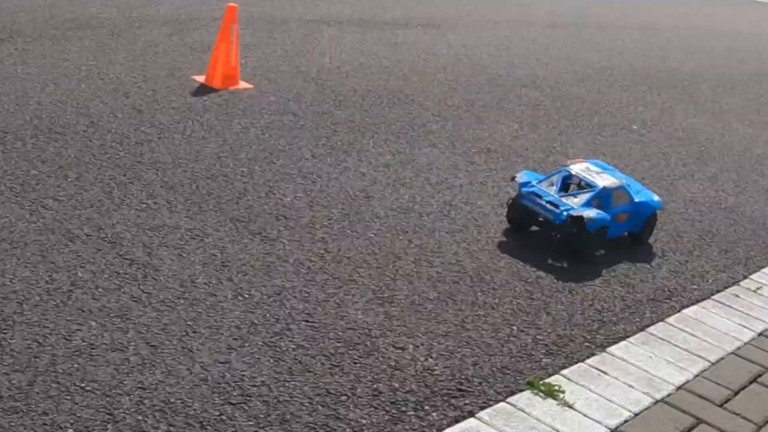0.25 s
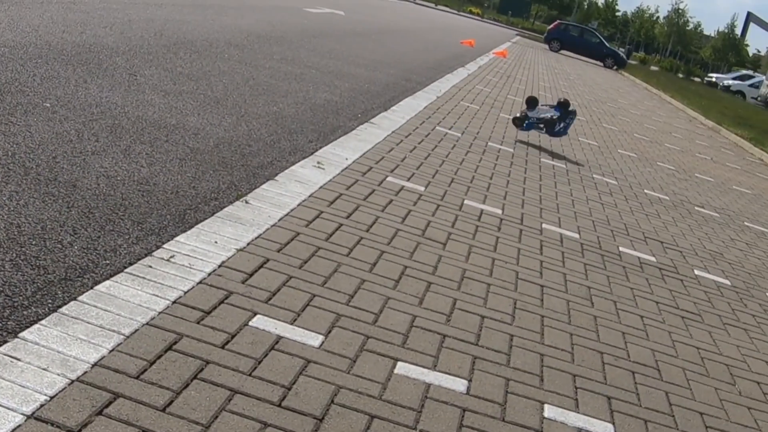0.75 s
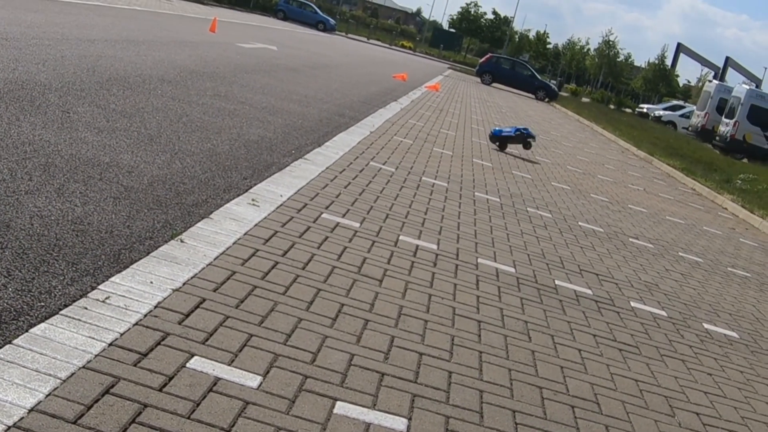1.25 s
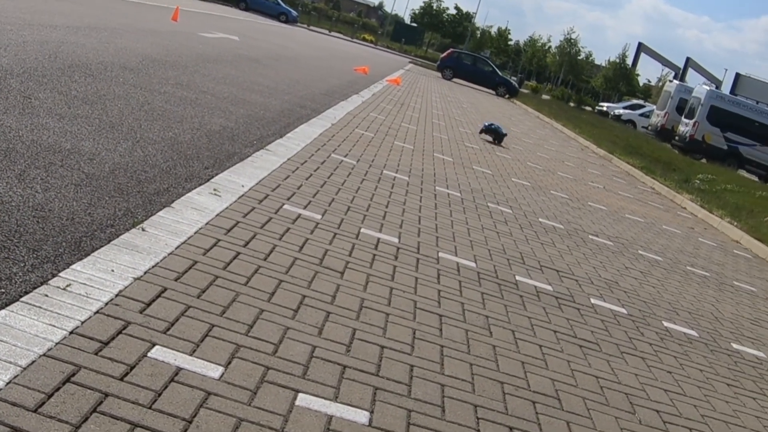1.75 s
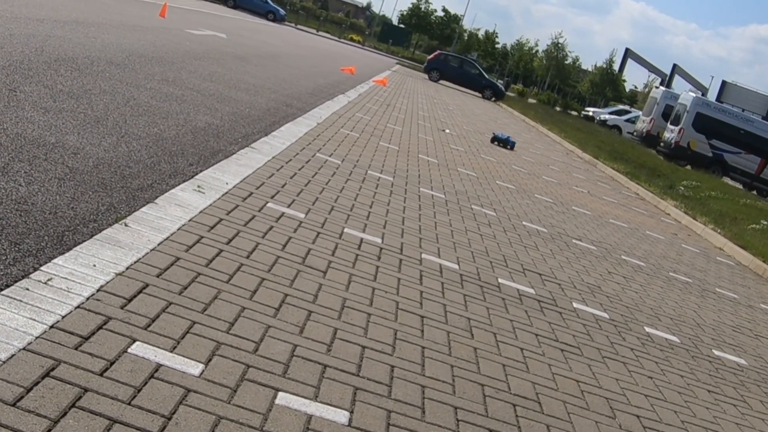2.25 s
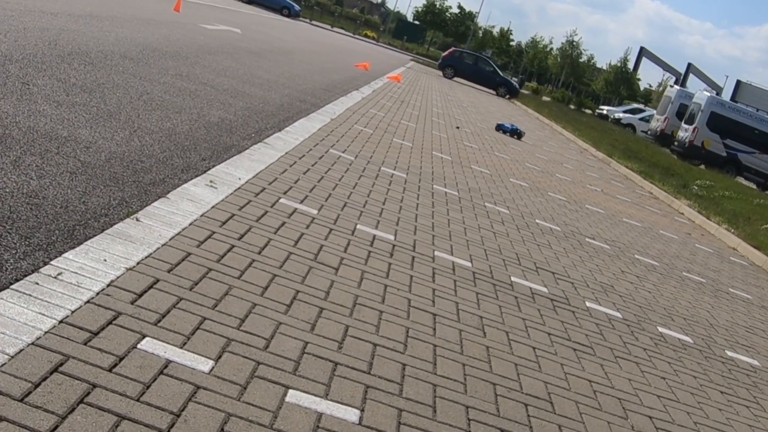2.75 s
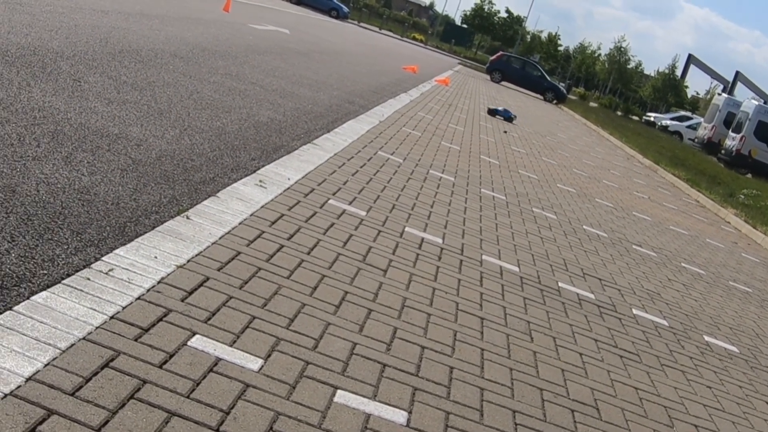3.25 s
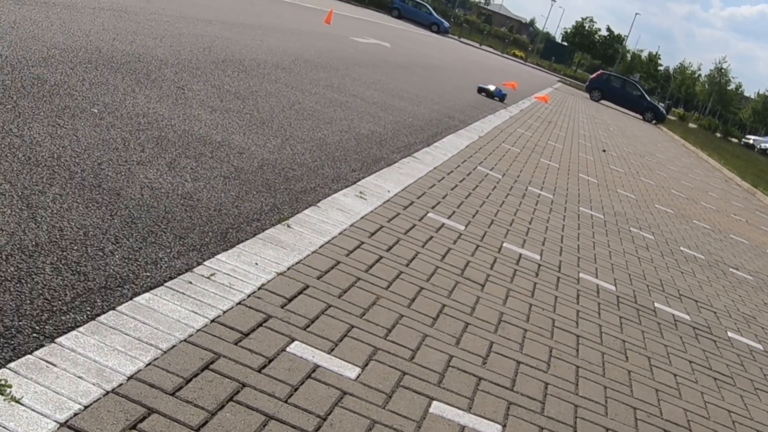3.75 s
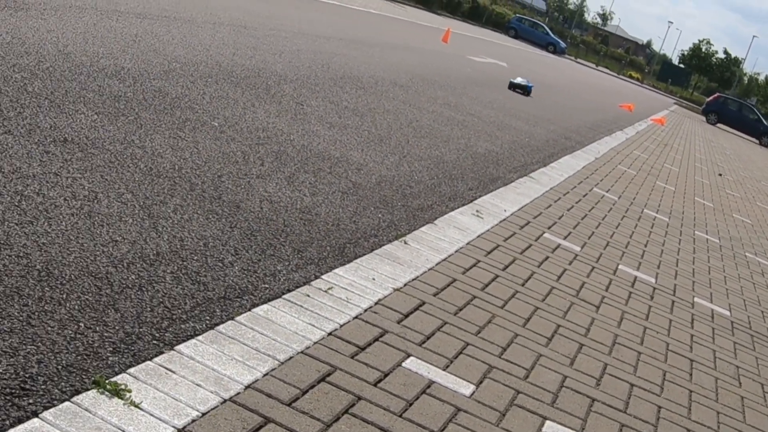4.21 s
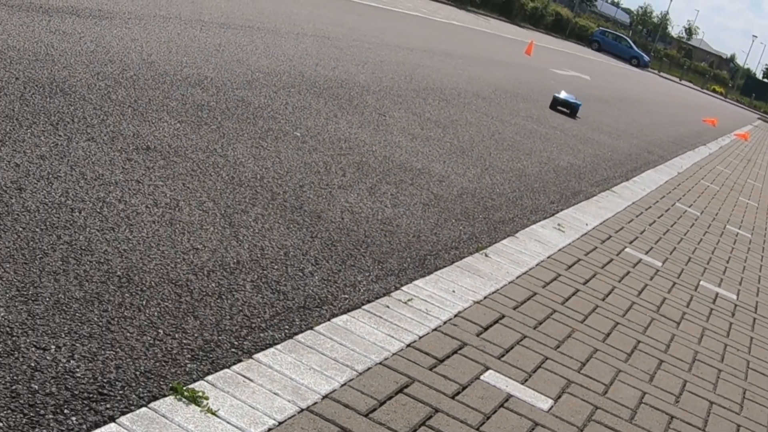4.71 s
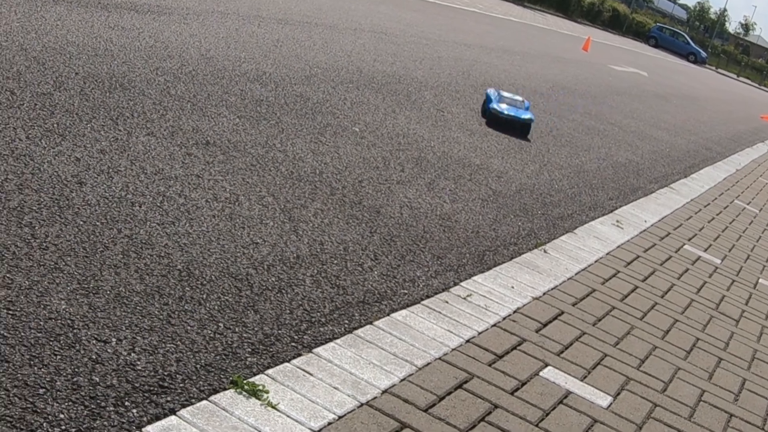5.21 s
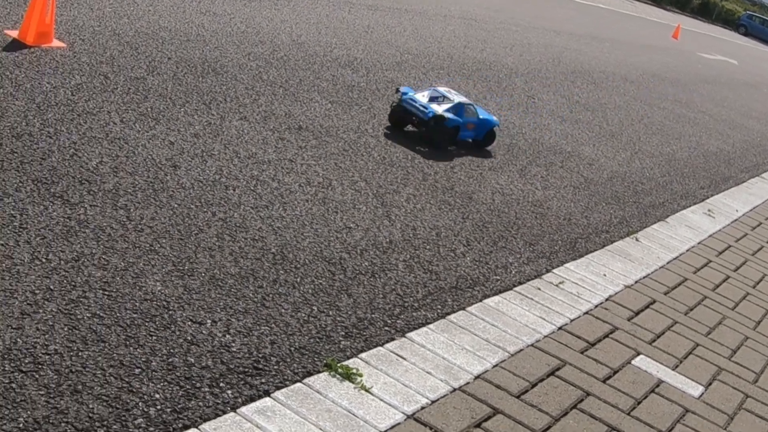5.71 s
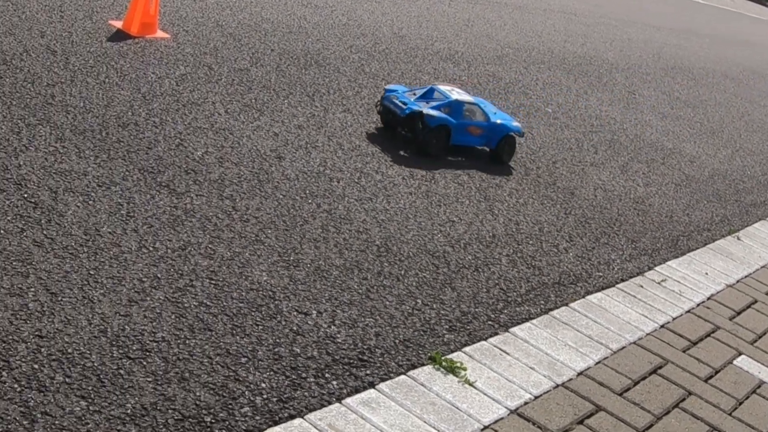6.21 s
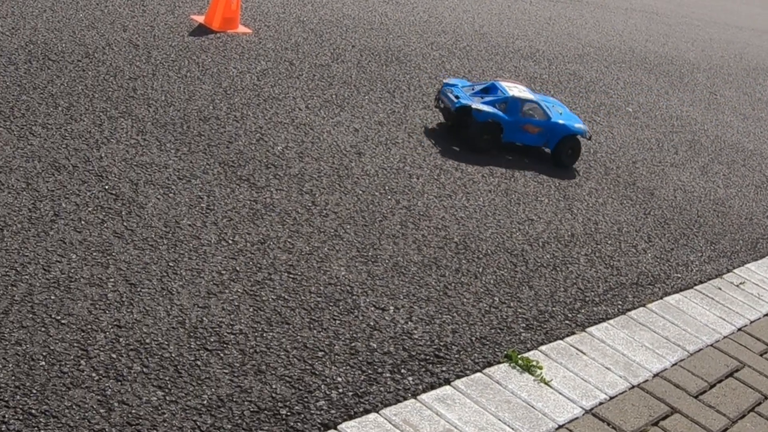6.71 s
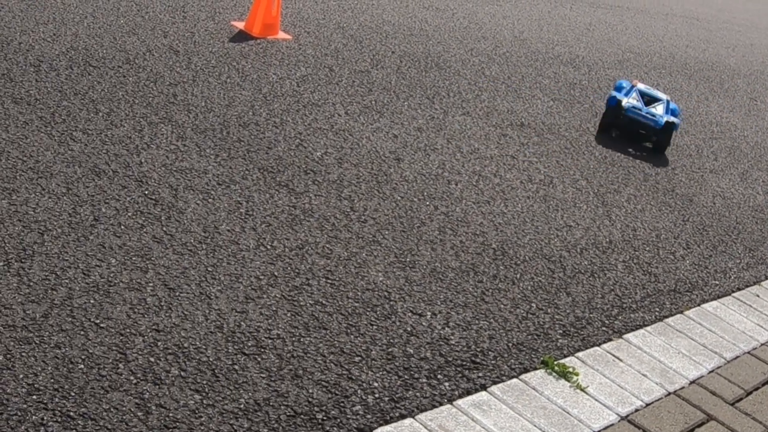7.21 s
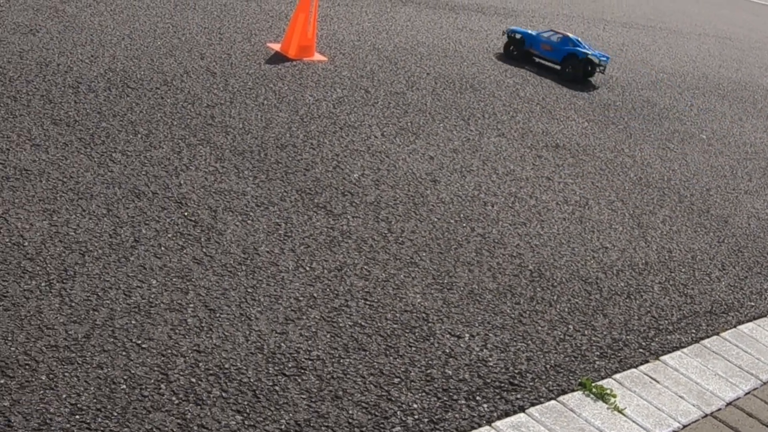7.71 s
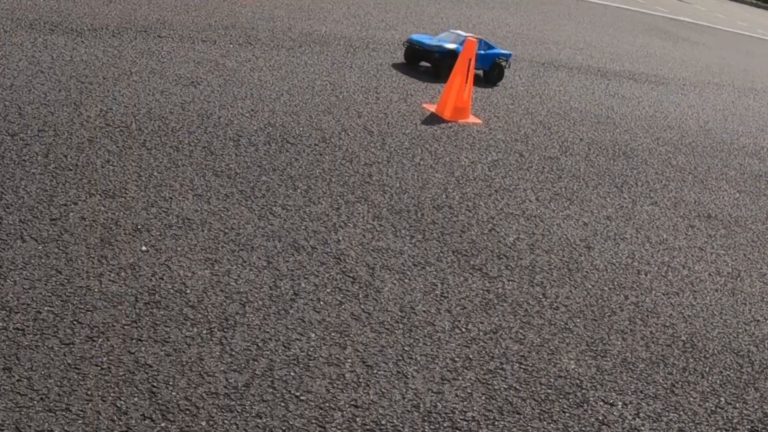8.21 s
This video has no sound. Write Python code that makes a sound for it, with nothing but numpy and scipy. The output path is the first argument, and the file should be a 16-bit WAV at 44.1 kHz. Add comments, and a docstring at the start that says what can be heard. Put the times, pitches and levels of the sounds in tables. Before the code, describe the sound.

High gear whine breaks into hard plastic knocks on brick; later brief motor blips, tyre scrabble and close controller clicks amid low wind rumble.

```python
"""A small electric toy truck on asphalt and brick, under gusty wind, with distant traffic and trees behind.
It races with whining gears, then knocks and scrapes over the brick as it tumbles; wind mode fades from mono to stereo.
A few throttle blips follow, the hand controller clicks close to the microphone, and the truck drives off and skids.
After more clicks it comes back in short blips. Gears are multiples of a mesh tone sent through a plastic shell;
tyres, wind and clicks are shaped noise, knocks are spikes with a short rattle."""
import sys
import numpy as np
from scipy import signal
from scipy.fft import rfft, irfft, next_fast_len
from scipy.io import wavfile
from scipy.ndimage import uniform_filter1d, map_coordinates

SR = 44100
rng = np.random.default_rng(int(sys.argv[2]) if len(sys.argv) > 2 else 0)


def output_pcm(signal):
    """Save a mono or channel-first signal as 16-bit PCM at the path in sys.argv[1].

    Samples are clipped to [-1, 1] before scaling.
    """
    pcm = np.clip(np.atleast_2d(signal).T, -1, 1) * 32767
    wavfile.write(sys.argv[1], SR, np.round(pcm).astype(np.int16))


N = 373086  # length [samples]


def amp(db):
    """Amplitude factor of a level in dB."""
    return 10 ** (np.asarray(db) / 20)


def unit(x):
    """x scaled to an rms of 1."""
    return x / np.sqrt(np.mean(x ** 2, axis=-1, keepdims=True) + 1e-20)


def along(points, hz, axis=1):
    """One column of (frequency, value, ..) rows, interpolated on a log frequency axis."""
    points = np.array(points)
    return np.interp(np.log(hz + 1), np.log(points[:, 0] + 1), points[:, axis])


def curves(rows):
    """One value per sample for each column after the time."""
    s, *columns = np.transpose(rows)
    return [np.interp(np.arange(N) / SR, s, column) for column in columns]


def wobble(rate):
    """A smooth random curve with `rate` knots a second."""
    coarse = np.arange(0, N + 8, 8)
    knots = rng.standard_normal(int(N * rate / SR) + 4)
    return np.interp(np.arange(N), coarse, map_coordinates(knots, [coarse * rate / SR]))


def filtered(x, response):
    """x through a complex response of frequency, padded by at least half a second."""
    size = next_fast_len(N + SR // 2)
    spectrum = rfft(x, size) * response(np.fft.rfftfreq(size, 1 / SR))
    return irfft(spectrum, size)[..., :N]


def coloured(x, spectrum):
    """x filtered to a spectrum table, then brought to an rms of 1."""
    return unit(filtered(x, lambda hz: amp(along(spectrum, hz))))


# Distant traffic and trees, spectrum: (frequency [Hz], relative density [dB per Hz])
FAR_SPECTRUM = [(180, -34), (300, -14.5), (450, -24), (850, -18), (1540, -20.5), (2300, -32.5), (2600, -46),
                (7080, -35), (15700, -92)]


def distant_traffic_and_trees():
    """Far sources blend into one noise of slowly varying level."""
    level_db = -61.0 + 0.53 * wobble(4.88)
    return amp(level_db) * coloured(rng.standard_normal(N), FAR_SPECTRUM)


# Wind at the microphone: (time [s], buffet level midway between the ports [dB])
WIND_LEVEL = [(0, -40.5), (.42, -29), (.9, -38.5), (1.37, -41), (1.52, -36), (2.26, -36.5), (2.52, -32.5),
              (2.69, -39.5), (3, -35), (3.86, -39.5), (3.96, -34), (4.09, -44.5), (4.25, -36), (4.4, -42.5),
              (5.2, -38.5), (5.43, -46), (5.7, -30.5), (6.48, -37.5), (6.84, -39.5), (7.1, -36),
              (7.21, -24.5), (7.36, -36.5), (7.64, -31), (8, -34.5), (8.46, -28)]
# Wind rumble, spectrum: (frequency [Hz], relative density [dB per Hz])
WIND_SPECTRUM = [(12, -39), (22, 5), (35, 1.5), (60, -5.5), (110, -10), (190, -16.5), (280, -28),
                 (500, -47), (1000, -100)]


def wind():
    """Lumpy buffeting, stronger on the right port; only the deepest part is shared."""
    shared, own = (amp(3.4 * wobble(14)) * coloured(rng.standard_normal(N), WIND_SPECTRUM) for _ in range(2))
    alike = lambda hz: 0.41 / (1 + (hz / 150) ** 2)
    unlike = lambda hz: np.sqrt(np.abs(1 - alike(hz) ** 2)) * (1 + hz / 400)
    left = filtered(shared, alike) + filtered(own, unlike)
    port_db = curves(WIND_LEVEL)[0] + [[-4], [4]]
    return amp(port_db) * unit(np.array([left, shared]))


# Hand controller close by: (time [s], level [dB], length before dying away [s])
CONTROLLER_CLICKS = [(3.886, -34.5, 0.014), (3.921, -35, 0.0089), (3.955, -32, 0.015),
                     (3.9593, -34.5, .001), (4.128, -38.5, 0.025), (6.212, -46, 0.0027),
                     (6.2421, -49, .004), (6.284, -55, .02), (6.35, -38.5, 0.012), (6.368, -38, 0.0065),
                     (6.375, -34.5, 0.0066), (6.394, -32.5, 0.014), (6.4105, -31, .001),
                     (6.416, -32.5, .0015), (6.419, -46, .022), (6.458, -43, 0.0075), (6.4673, -37.5, .002),
                     (6.881, -41.5, .006), (7.198, -41, 0.0066), (8.209, -39, 0.006),
                     (8.225, -26.5, 0.0034)]
# The controller's plastic case, spectrum: (frequency [Hz], relative density [dB per Hz])
CONTROLLER_SPECTRUM = [(240, -37), (400, 3.5), (875, -6.5), (1370, 1.5), (2000, 5), (3130, -7), (4810, -8),
                       (5190, -10.5), (8620, -4), (15700, -34)]


def controller():
    """Trigger and wheel scrape and click close to the right port; the left hears them dull and inverted."""
    level, t = np.zeros(N + SR), np.arange(SR // 20) / SR
    case = coloured(rng.standard_normal(N) * amp(4.7 * wobble(1500)), CONTROLLER_SPECTRUM)
    for s, db, length in CONTROLLER_CLICKS:
        catch = 1 + 0.18 * np.exp(-t / 0.0017)  # the part breaks loose with a tick
        decay = amp(-60 * np.clip(t - length, 0, 1) / 0.021)  # 60 dB in 21 ms
        level[round(s * SR):][:len(t)] += amp(db) * catch * decay
    right = level[:N] * case
    left = filtered(right, lambda hz: -amp(-6) / (1 + 1j * hz / 2500))
    return np.array([left, right])


# The truck's plastic shell, resonances: (centre [Hz], width [Hz], gain [dB])
SHELL_MODES = [(982, 390, 2.5), (1530, 340, 4), (1940, 600, 0.5), (3150, 850, 1), (3915, 760, 0),
               (6330, 500, 0)]


def shell(f):
    """Resonances of the plastic body, with some sound passing beside them."""
    response = 0.072
    for k, (centre, width, db) in enumerate(SHELL_MODES):
        resonance = 1j * f * width / (centre * centre - f * f + 1j * f * width)
        response = response + (-1) ** k * amp(db) * resonance
    return response


def bursts(rows, t60):
    """A sharp spike with a short rattle of noise for each (time [s], level [dB]) row; t60 [s] to fall 60 dB."""
    out, t = np.zeros(N + SR), np.arange(SR // 20) / SR
    for s, db in rows:
        puff = 0.5 * amp(-60 * t / t60) * rng.standard_normal(len(t))
        puff[0] = -2.1
        out[round(s * SR):][:len(t)] += amp(db) * puff
    return out[:N]


# Shell and stones on brick, burst levels before filtering:
# (time [s], crack level [dB], thud level [dB], tick level [dB])
BRICK_KNOCKS = [(.396, -20, -7, -30), (0.4094, -2, -4.5, -25), (0.4247, -6, -3, -25), (0.4342, -4, -6, -14),
                (0.4432, -4.5, -13, -14), (0.461, -2, -12, -22), (0.4726, -6, -14, -24),
                (.488, -2.5, -19, -15), (.5166, -8, -21, -15), (0.552, -19, -24, -8), (0.568, -9, -14, -20),
                (.592, -18, -7, -24), (0.964, -23, -25, -32), (0.983, -23, -17, -36),
                (1.001, -11, -10, -28), (1.042, -14, -2, -27), (1.051, -8.5, -7.5, -25),
                (1.062, -12, -10, -26), (1.32, -36, -20.5, -48), (1.432, -22, -16.5, -34),
                (1.732, -23, -29, -46)]


def knocks():
    """Each contact cracks in the shell, thuds in the chassis and ticks where grit is hit."""
    s, crack_db, thud_db, tick_db = np.transpose(BRICK_KNOCKS)
    dulled_shell = lambda f: (shell(f) + 0.36) / (1 + 1j * f / 4500) ** 2
    treble = lambda f: (1j * f / (5000 + 1j * f)) ** 2
    chassis = lambda f: 1j * f * 300 / (330 ** 2 - f * f + 1j * f * 300)
    crack = filtered(bursts(zip(s, crack_db), 0.011), dulled_shell)
    tick = filtered(bursts(zip(s, tick_db), 0.0082), treble)
    thud = filtered(bursts(zip(s, thud_db), 0.037), chassis)
    return crack + tick + thud


def gritty(depth_db, rate, patchy_db):
    """Noise whose strength jumps as grit catches, with brief narrow squeaks and hollows."""
    z = signal.stft(rng.standard_normal(N), nperseg=512)[2]
    across_hz = uniform_filter1d(rng.standard_normal(z.shape), 2, 0)
    patches = uniform_filter1d(across_hz, 5, 1)
    noise = signal.istft(z * amp(patchy_db * patches / patches.std()), nperseg=512)[1][:N]
    return noise * amp(depth_db * wobble(rate) + 1.2 * wobble(20))


def swells(start, length, db, attack_s, swell_db, fall_db_per_s):
    """Power of events that fade in around their start, grow until their end and then die away."""
    coarse = np.arange(0, N, 32)
    t = coarse[:, None] / SR - start
    left = np.clip(1 - t / length, 0, 1)  # share of the event still to come
    level_db = db - swell_db * left ** 2 - fall_db_per_s * np.clip(t - length, 0, None)
    fade_in = np.clip(0.5 + t / attack_s, 0, 1)
    power = np.sum(amp(2 * level_db) * fade_in ** 2, 1)
    return np.interp(np.arange(N), coarse, power)


# Changing rolling, coasting and skidding levels: (time [s], scrabble level [dB], hiss level [dB])
ROLLING_LEVELS = [(0, -36.5, -31), (.37, -35, -32), (.43, -37, -32), (.62, -38, -39), (.86, -63, -60),
                  (1.11, -45.5, -58), (1.29, -63, -75), (1.41, -42.5, -54), (1.65, -57.5, -56.5),
                  (2.24, -69, -75.5), (2.9, -58, -66), (3.4, -56.5, -61.5), (3.67, -54, -64),
                  (3.86, -53, -55), (4.2, -57, -53.5), (4.4, -52, -48), (4.52, -48.5, -37.5),
                  (4.8, -40.5, -40), (4.941, -48.5, -46.5), (4.99, -43, -40.5), (5.15, -38.5, -42.5),
                  (5.42, -33, -43.5), (5.6, -35, -47.5), (5.73, -54.5, -50.5), (6.19, -52.5, -54.5),
                  (6.33, -64, -66.5), (6.49, -51.5, -58.5), (6.8, -55.5, -61.5), (7.1, -54.5, -51.5),
                  (7.66, -52, -56.5), (8.05, -48.5, -52), (8.46, -47, -49.5)]
# The tumbling truck scrapes the brick: (time [s], length [s], scrabble level [dB], hiss level [dB])
BRICK_SCRAPES = [(0.645, 0.095, -39.5, -42.5), (0.781, 0.043, -42, -50), (0.887, 0.036, -52, -58),
                 (0.963, 0.05, -30.5, -41.5), (1.034, 0.022, -25, -39.5), (1.152, 0.027, -41, -62),
                 (1.33, 0.034, -46.5, -47), (1.422, .1, -44, -42.5), (1.544, 0.054, -43.5, -46),
                 (1.734, 0.028, -41.5, -47)]
# Tyre scrabble, spectrum: (frequency [Hz], relative density [dB per Hz])
SCRABBLE_SPECTRUM = [(120, -6.5), (250, -3.5), (450, -2.5), (900, -1), (1300, -8.5), (2300, -19.5),
                     (4000, -25.5), (8000, -53)]
# Gear and grit hiss, spectrum: (frequency [Hz], relative density [dB per Hz])
HISS_SPECTRUM = [(700, -35), (1200, -10.5), (1500, -8), (2000, -8), (2500, -13), (3600, -13.5), (5100, -20),
                 (6500, -10.5), (8300, -17.5), (9300, -17), (10800, -21.5), (13200, -21.5), (14600, -32),
                 (16000, -39)]
SCRAPE = dict(attack_s=0.006, swell_db=4.5, fall_db_per_s=504)
WHEELSPIN = dict(attack_s=0.073, swell_db=4.5, fall_db_per_s=392)


def rolling():
    """Tyres scrabble through the shell; gears and grit hiss. Scrapes and wheelspin add power to rolling and skidding."""
    scrape_s, scrape_length, *scrape_db = np.transpose(BRICK_SCRAPES)
    blip_s, blip_length, *_, spin_scrabble_db, spin_hiss_db = np.transpose(THROTTLE_BLIPS)
    levels = []
    for rolling_db, scraping_db, spinning_db in zip(curves(ROLLING_LEVELS), scrape_db,
                                                    (spin_scrabble_db, spin_hiss_db)):
        power = amp(2 * rolling_db)
        power = power + swells(scrape_s, scrape_length, scraping_db, **SCRAPE)
        power = power + swells(blip_s, blip_length, spinning_db, **WHEELSPIN)
        levels.append(np.sqrt(power))
    scrabble, hiss = levels
    in_shell = filtered(gritty(1.1, 250, patchy_db=3), lambda f: 0.64 + 1.12 * abs(shell(f)))
    tyres = coloured(in_shell, SCRABBLE_SPECTRUM)
    grit = coloured(gritty(1.77, 500, patchy_db=3.5), HISS_SPECTRUM)
    return scrabble * tyres + hiss * grit


# Throttle blips: (time [s], length [s], spin-up [s], first mesh [Hz], mesh at full spin-up [Hz],
# loudest region [Hz], whine loudest after [s], whine level before the shell [dB], whine fade [dB per s],
# wheelspin scrabble level [dB], wheelspin hiss level [dB])
THROTTLE_BLIPS = [(2.456, 0.16, 0.062, 720, 740, 1510, 0.069, -51.5, 160, -54, -55.5),
                  (2.943, 0.15, .1, 540, 973, 1690, 0.11, -58.5, 60, -58, -63.5),
                  (3.197, 0.17, .09, 683, 954, 1090, 0.17, -47, 40, -53, -54),
                  (3.463, 0.12, 0.08, 780, 1057, 2620, 0.025, -52.5, 120, -57, -49.5),
                  (3.715, 0.12, 0.091, 640, 746, 1500, 0.048, -62, 80, -67, -48.5),
                  (6.643, 0.067, 0.083, 470, 1010, 1220, 0.027, -37, 200, -42.5, -40),
                  (6.921, 0.12, 0.1, 430.6, 996, 1300, 0.051, -34.5, 150, -40.5, -40),
                  (7.221, 0.14, 0.1, 742, 1197, 1450, 0.02, -31.5, 300, -40.5, -37),
                  (7.764, .17, 0.13, 497.4, 1158, 1700, 0.11, -38.5, 115, -41.5, -43),
                  (8.084, 0.12, 0.072, 800, 1442, 2630, 0.082, -39.5, 130, -39, -38.5),
                  (8.381, 0.094, 0.12, 817, 1870, 2560, 0.087, -37, 100, -37.5, -36.5)]
BLIP_ROUGHNESS = 0.48  # 0-1


def blip(s, length, spin_up, first_hz, last_hz, region_hz, loudest_s, db, fade_db_per_s, *_):
    """The motor spins up along an S curve; the whine swells to one moment and fades."""
    t = np.linspace(0, length, 40)
    u = np.clip(t / spin_up, 0, 1)
    hz = first_hz + (last_hz - first_hz) * u * u * (3 - 2 * u)
    level_db = db - fade_db_per_s * abs(t - loudest_s)
    loudest_multiple = np.maximum(region_hz / hz, 1)
    return np.transpose([s + t, hz, level_db, loudest_multiple, BLIP_ROUGHNESS + 0 * t])


# Driving and coasting whines, one list each: (time [s], gear mesh before slip [Hz],
# whine level before the shell [dB], loudest multiple of the mesh, roughness [0-1])
DRIVE_AND_COAST_WHINES = [
    [(0, 2248, -25, 1.45, .2), (.05, 2190, -27, 1.75, 0.1), (.19, 2150, -23.5, 1.38, 0.3),
     (.31, 2180, -24, 1.5, 0.3), (.365, 2125, -32, 1.5, .2), (.41, 2055, -37, 1.45, .2)],
    [(3.07, 930, -58, 1.8, .6), (3.2, 850, -63, 2, .6)],
    [(3.54, 960, -46, 1.1, .4), (3.63, 800, -55, 1.1, .4)],
    [(4, 668, -56.5, 4.4, .5), (4.17, 775, -54, 4.5, 0.6), (4.4, 830, -49.5, 4.7, 0.4),
     (4.45, 960, -43, 3.8, .8), (4.49, 1325, -36, 3.2, .9), (4.525, 1660, -28, 2.5, .6),
     (4.56, 1880, -30, 1.9, 0.3), (4.63, 2022, -25, 1.55, 0.4), (4.79, 2116, -26, 1.5, 0.6),
     (4.835, 1853, -28, 1.7, 0.5), (4.87, 1570, -43, 2, .7), (4.885, 1600, -32, 1.9, .8),
     (4.95, 1410, -35.5, 1.9, 0.6), (4.968, 1300, -48, 2.8, .7), (4.985, 1278, -28, 2.6, 0.5),
     (5.015, 1034, -28, 2.8, 0.5), (5.025, 956, -36, 3.8, .6), (5.04, 887, -35.5, 4.1, 0.57),
     (5.065, 820, -36, 4.3, 0.8), (5.085, 760, -50, 4, .9)],
    [(5.8, 500, -52.5, 2.8, 0.6), (6.19, 496, -51, 2.8, 0.6)],
    [(7.38, 874, -47.5, 3.5, 0.7), (7.55, 894, -58, 3.5, 0.8), (7.72, 850, -66, 3.3, .6)],
    [(8.23, 877, -49.5, 3.6, 0.7), (8.34, 785, -50.5, 3.6, .6)],
]
LOAD_PER_S = 5.5  # speeding up by this share a second makes the upper multiples much stronger; slowing dulls them


def gears():
    """Worn teeth mesh unevenly: every multiple flutters, most at low speed, and wears a rough halo."""
    out, slip = np.zeros(N), wobble(200)
    multiple = np.arange(1, 8)[:, None]
    flutter = np.array([0.8 * wobble(280) + 0.6 * wobble(60) for _ in multiple])
    halo = np.array([wobble(1300) for _ in multiple])
    for burst in DRIVE_AND_COAST_WHINES + [blip(*row) for row in THROTTLE_BLIPS]:
        s, *controls = np.transpose(burst)
        i = np.arange(max(int(s[0] * SR), 0), min(int(s[-1] * SR), N))
        hz, db, loudest, rough = (np.interp(i / SR, s, control) for control in controls)
        turns = np.cumsum(hz + (12 + 0.0055 * hz) * slip[i]) / SR
        speeding_up = uniform_filter1d(np.gradient(np.log(hz)) * SR, SR // 50)  # share a second
        load = np.clip(speeding_up / LOAD_PER_S, -1.5, 0.6)
        # the level falls off on both sides of the loudest multiple
        slope_db = np.where(multiple > loudest, -24 * np.exp(-load), -15)
        level_db = slope_db * np.log2(multiple / np.abs(loudest)) ** 2
        level_db += (6.3 - hz / 500) * flutter[:, i]
        edge = np.clip(np.minimum(i - i[0], i[-1] - i) / (0.013 * SR), 0, 1)  # 13 ms fades
        roughness = (1 + rough * halo[:, i]) / np.sqrt(1 + rough ** 2)
        teeth = roughness * np.sin(2 * np.pi * multiple * turns)
        out[i] += amp(db) * edge * np.sum(amp(level_db) * teeth, 0)
    return filtered(out, shell)


# The two microphone ports: (frequency [Hz], left over right [dB], left leads by [radians],
# likeness before the source's own factor [0-1])
MICROPHONE_PORTS = [(304, -10.5, 2.4, 0.94), (467, -12, 2.1, .85), (800, -4, 2.3, 0.95), (1160, 0, 2, 0.94),
                    (2260, 1, 1.1, 0.93), (4000, -4, 0.8, 0.95), (5000, -1.5, -0.8, 0.59),
                    (6690, -4, 1, 0.63), (7630, 2, -8.5, 1), (8500, -12.5, 4, 0.2), (9900, -15.5, -.5, .6),
                    (11200, -10.5, 2, .65), (11900, 1, .4, .9), (16000, -1, -.2, .88)]


def ports(x, likeness):
    """The housing sets level and phase between the ports; a short scatter makes part of the left unlike the right."""
    t = np.arange(SR // 10) / SR
    scatter = rng.standard_normal(SR // 10) * amp(-60 * t / 0.037)
    other = signal.fftconvolve(x, scatter / np.linalg.norm(scatter))[:N]

    def tilt(hz):  # half the difference goes to each port
        return amp(along(MICROPHONE_PORTS, hz) / 2) * np.exp(0.5j * along(MICROPHONE_PORTS, hz, axis=2))

    alike = lambda hz: np.clip(likeness * along(MICROPHONE_PORTS, hz, axis=3), 0, 1)
    left = filtered(x, lambda hz: tilt(hz) * alike(hz))
    left = left + filtered(other, lambda hz: tilt(hz) * np.sqrt(1 - alike(hz) ** 2))
    right = filtered(x, lambda hz: 1 / tilt(hz))
    return np.array([left, right])


def scene():
    """Far background and truck reach both ports through the housing; controller and wind act on the ports directly."""
    background = ports(distant_traffic_and_trees(), likeness=0.79)
    truck = ports(rolling() + gears() + knocks(), likeness=1.0)
    return background + wind() + controller() + truck


# Tone of the microphone's mono wind mode: (frequency [Hz], gain [dB])
WIND_MODE_TONE = [(20, -11), (60, -7), (110, -2.5), (170, 6.5), (400, 4), (2000, -1), (6000, -2),
                  (8000, -1.5), (9500, -13.5), (10800, -26), (12500, 3.5), (14500, 0), (16000, 2)]
STEREO_S = (1.49, 2.15)  # fade from mono to stereo, start and end [s]
TOP_HZ = 15830  # band limit [Hz]


def record(dry):
    """Wind mode mixes the ports to mono and cuts the deep bass; nothing is kept above the band limit."""
    mono = filtered(dry.mean(0), lambda hz: amp(along(WIND_MODE_TONE, hz)))
    stereo = np.interp(np.arange(N) / SR, STEREO_S, [0, 1])
    mixed = stereo * dry + (1 - stereo) * mono
    return filtered(mixed, lambda hz: np.clip((TOP_HZ - hz) / 100, 0, 1))


dry = scene()
out = record(dry)
output_pcm(out)
```